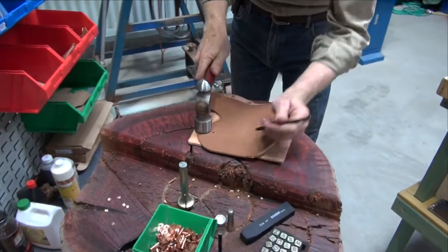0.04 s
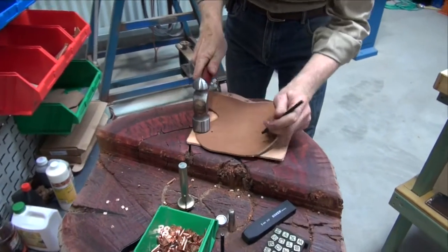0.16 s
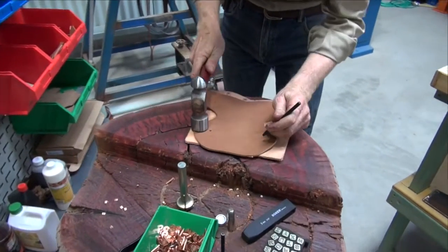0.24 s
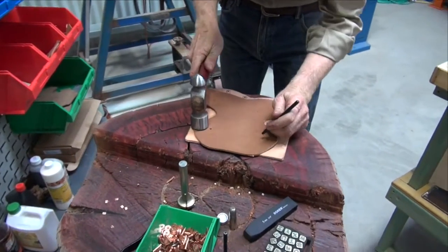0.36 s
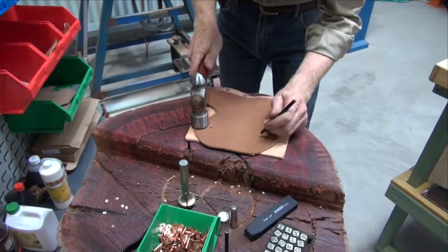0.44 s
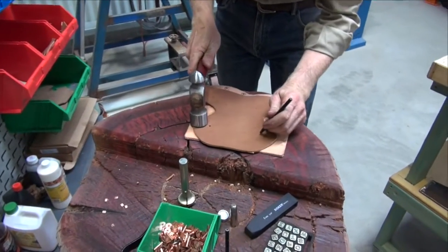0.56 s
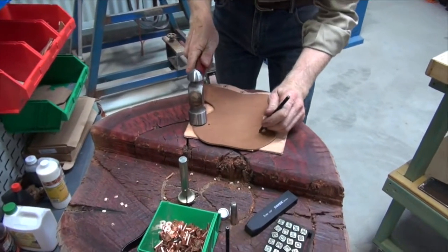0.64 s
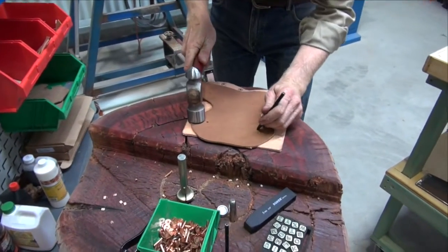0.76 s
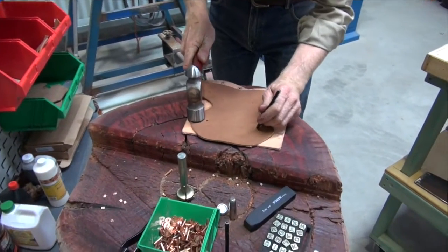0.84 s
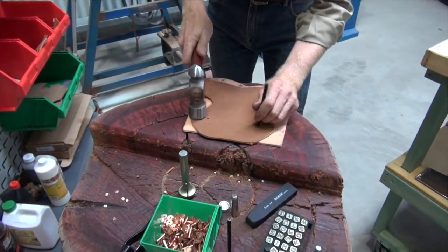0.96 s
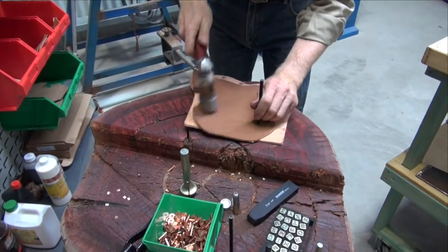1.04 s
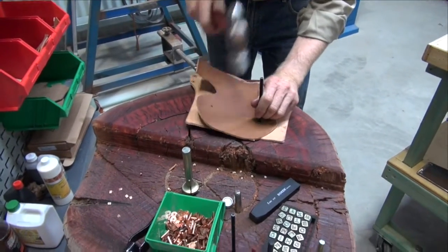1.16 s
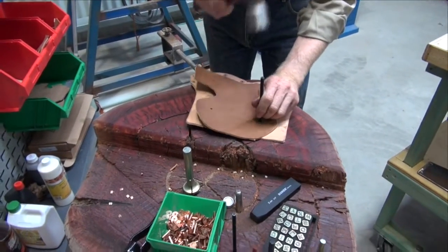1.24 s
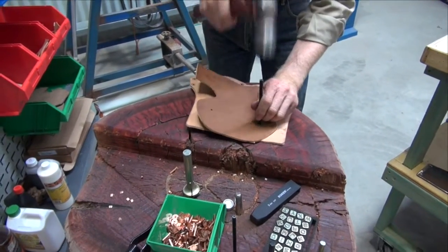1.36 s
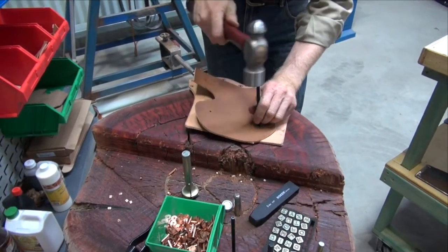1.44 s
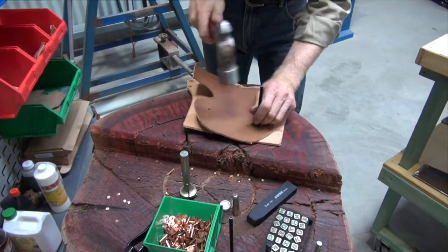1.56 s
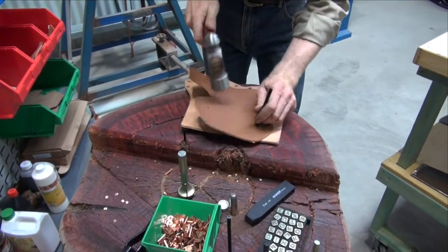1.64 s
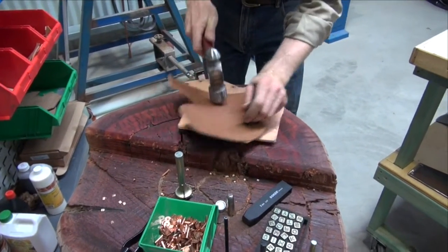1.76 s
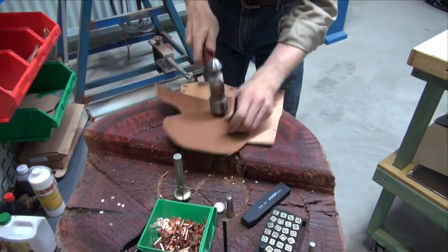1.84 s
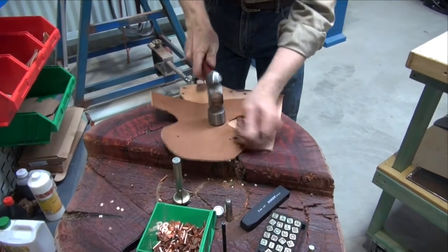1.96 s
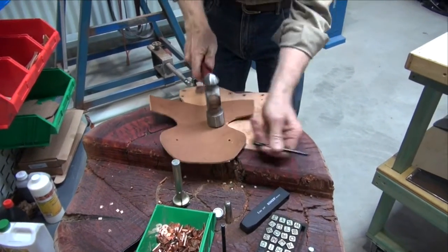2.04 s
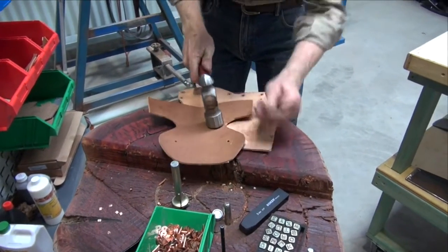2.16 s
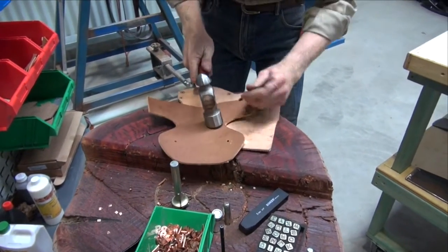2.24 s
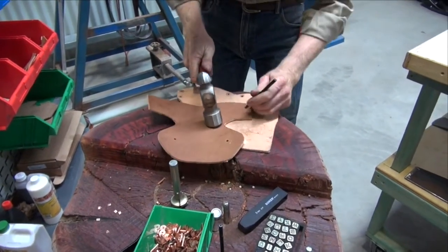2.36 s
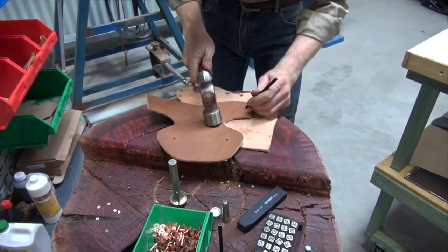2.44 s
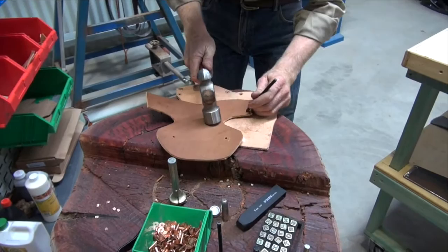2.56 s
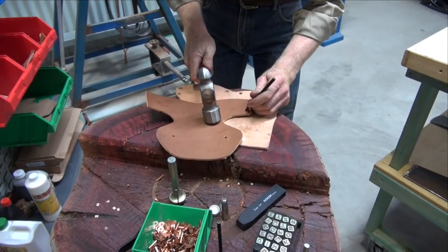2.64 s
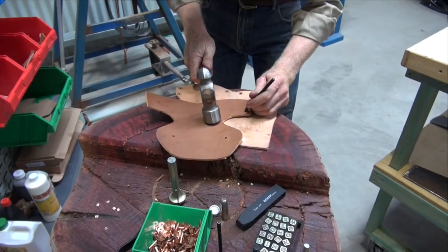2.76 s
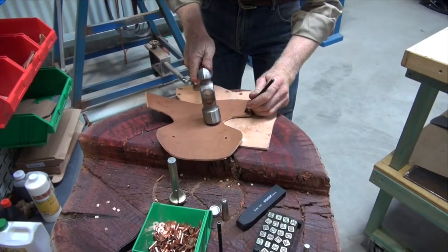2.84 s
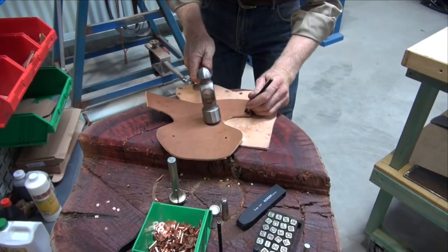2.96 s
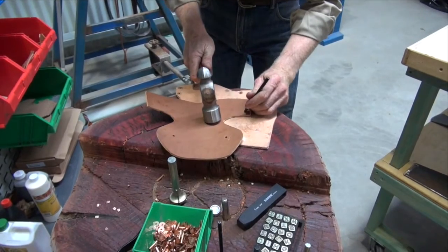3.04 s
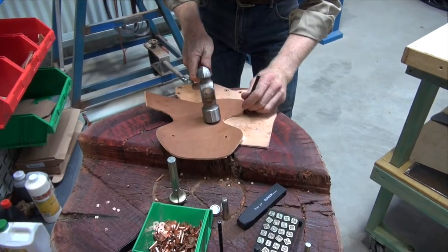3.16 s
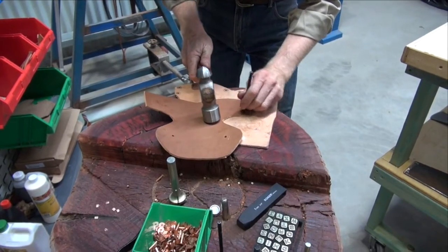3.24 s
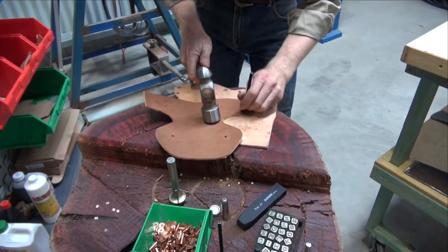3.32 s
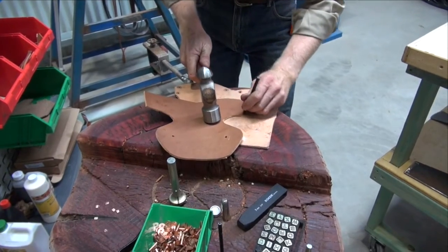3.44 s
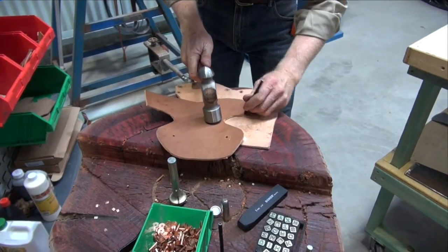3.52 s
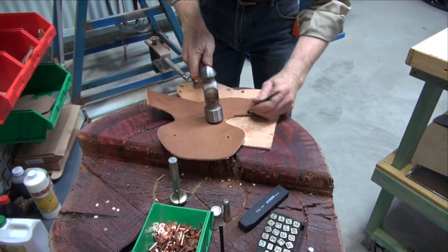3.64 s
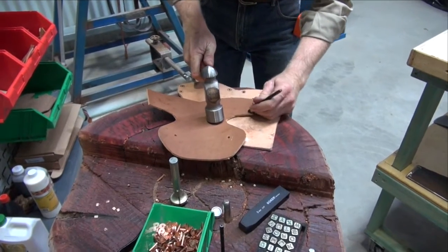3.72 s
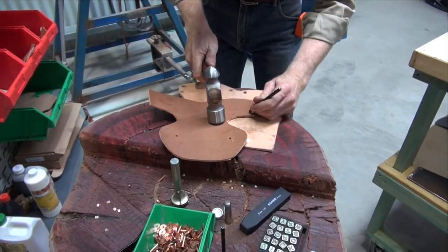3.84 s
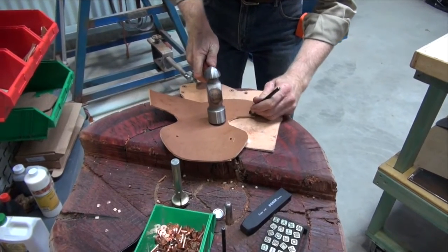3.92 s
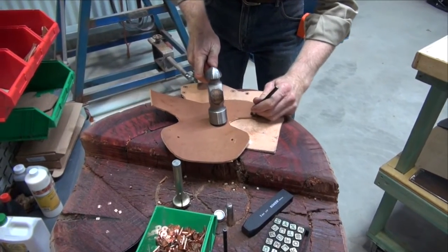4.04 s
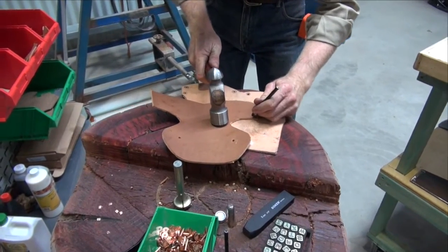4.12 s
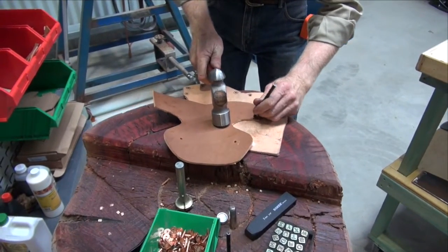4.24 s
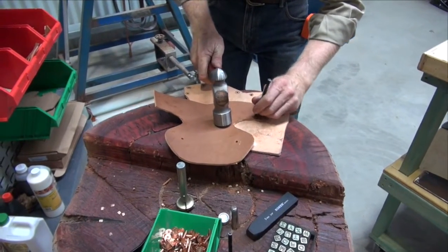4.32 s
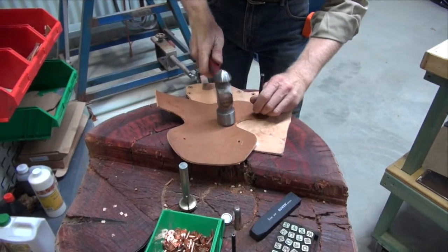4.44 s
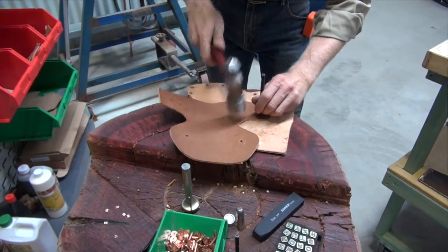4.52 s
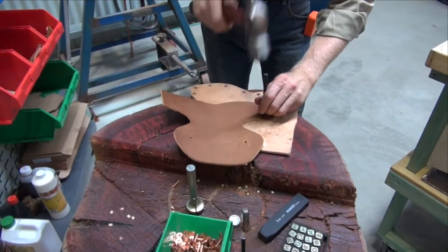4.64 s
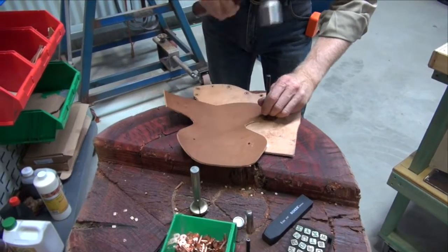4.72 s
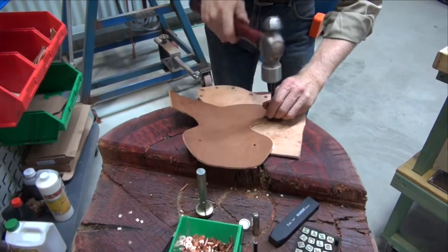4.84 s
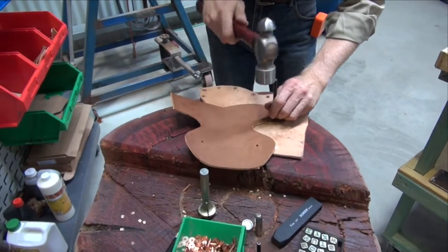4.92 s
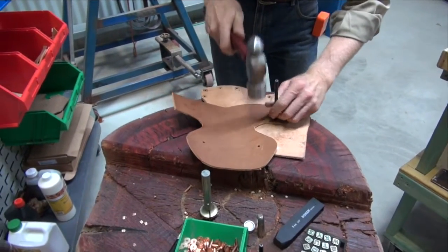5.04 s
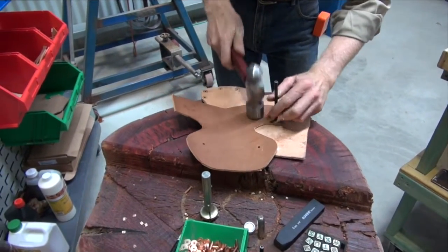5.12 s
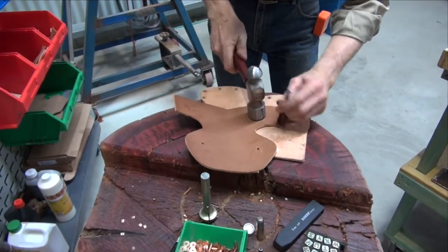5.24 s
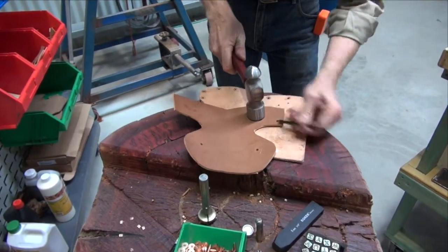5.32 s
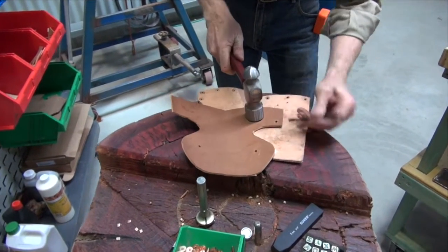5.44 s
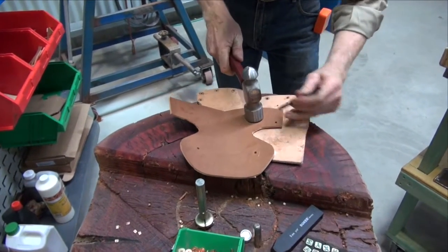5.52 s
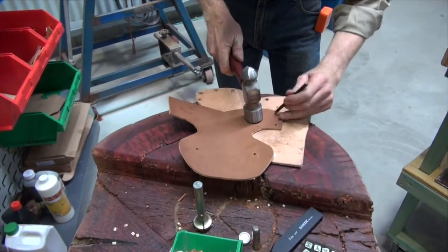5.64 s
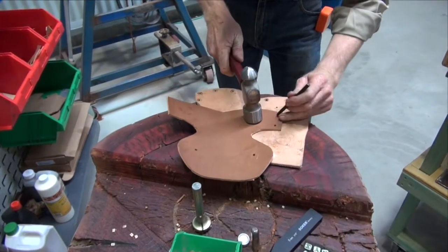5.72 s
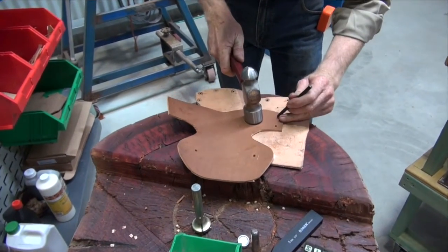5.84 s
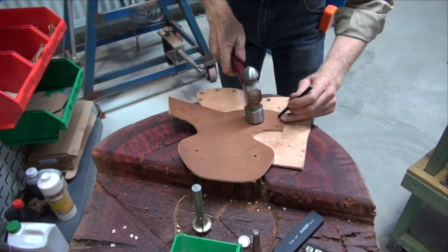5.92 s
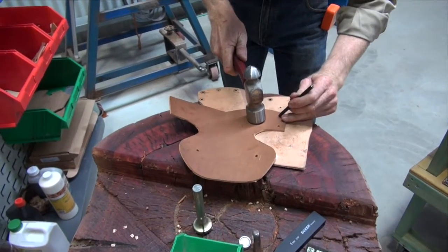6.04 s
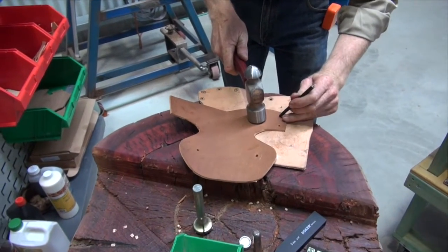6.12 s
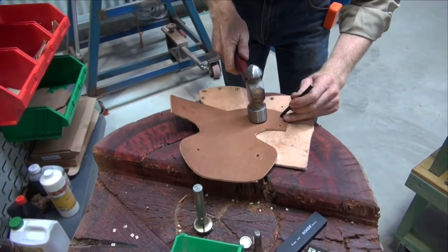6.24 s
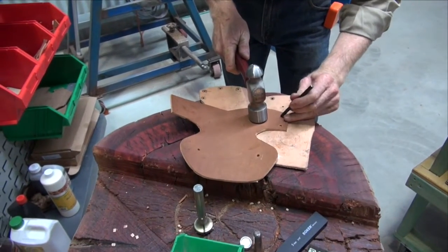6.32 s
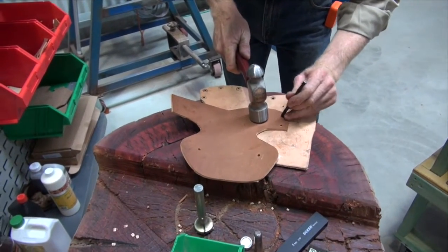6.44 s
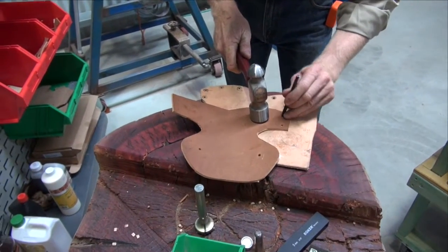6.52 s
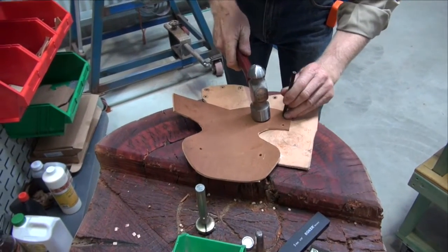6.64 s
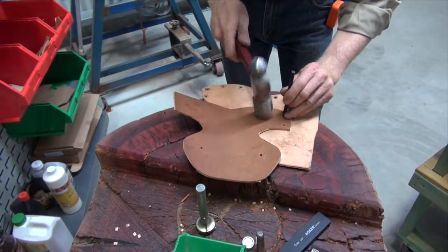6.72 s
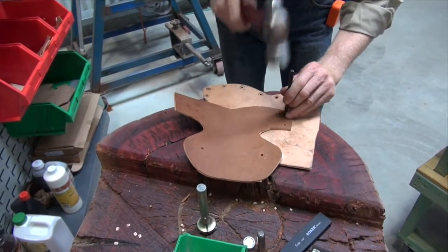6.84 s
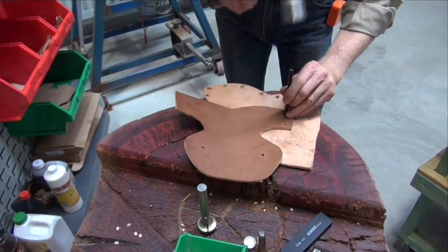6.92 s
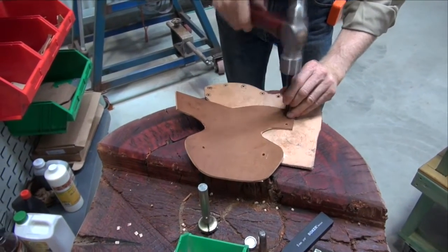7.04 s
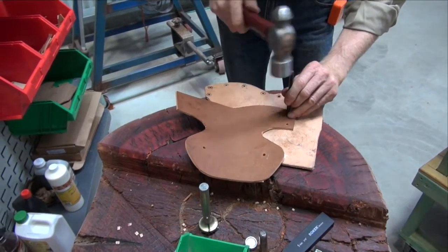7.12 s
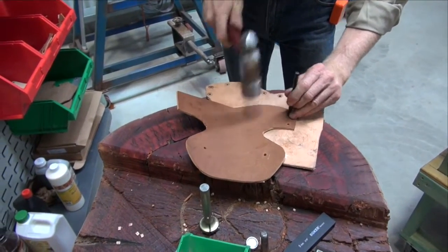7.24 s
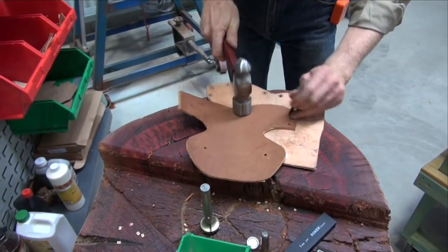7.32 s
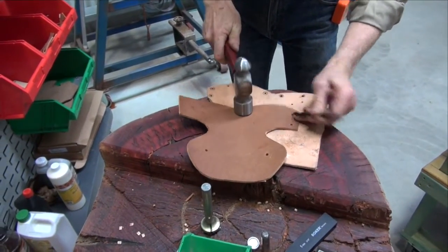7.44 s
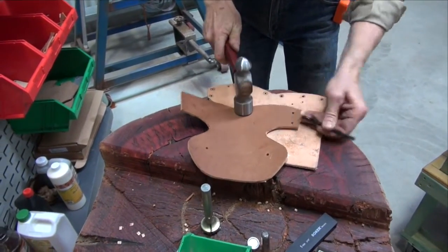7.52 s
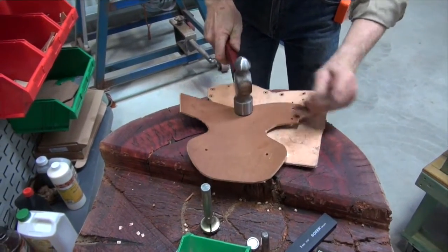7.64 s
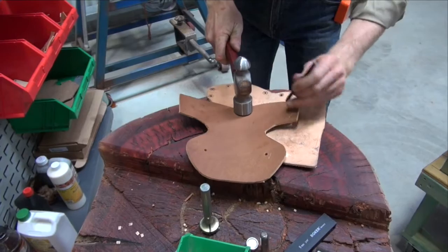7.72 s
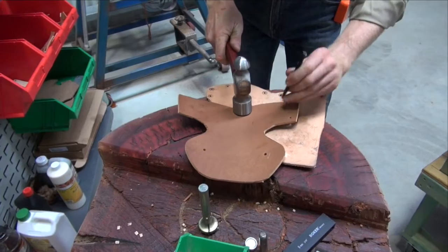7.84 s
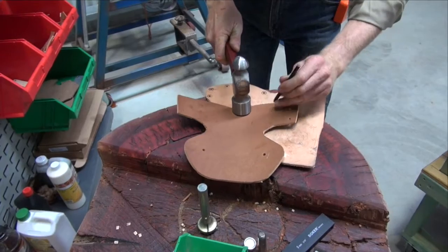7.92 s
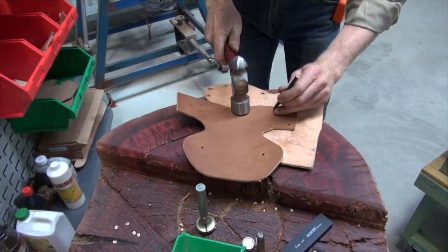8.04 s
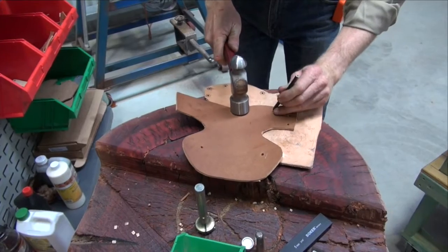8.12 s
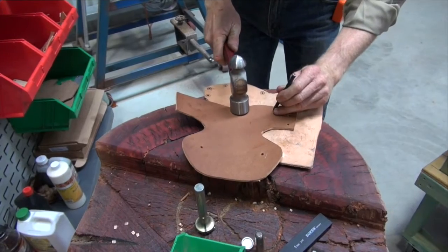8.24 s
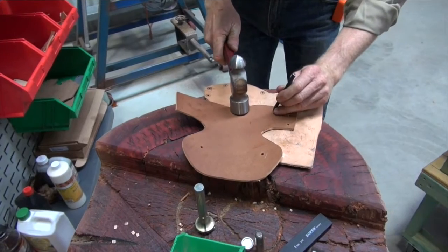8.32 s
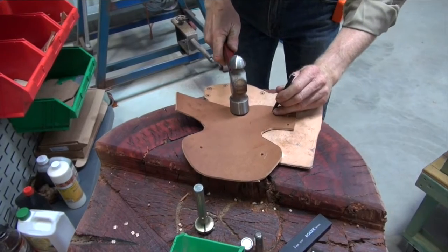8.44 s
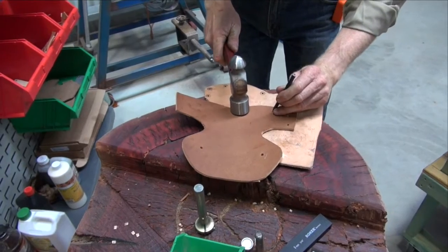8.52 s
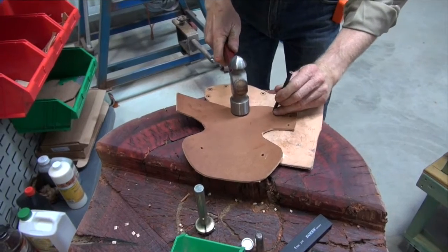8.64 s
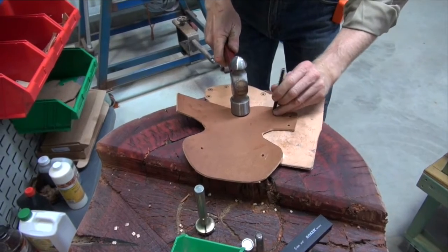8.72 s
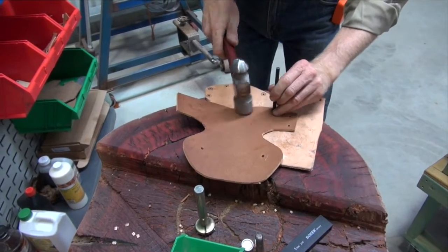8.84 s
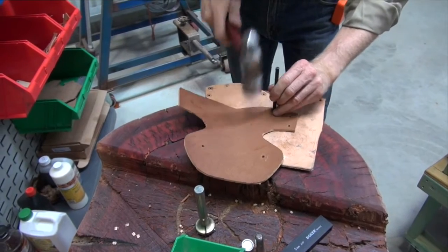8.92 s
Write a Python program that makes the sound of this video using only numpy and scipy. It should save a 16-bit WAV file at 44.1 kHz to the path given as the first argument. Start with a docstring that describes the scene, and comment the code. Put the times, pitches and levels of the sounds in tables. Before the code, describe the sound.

Three widely spaced, explosive metal cracks, each with a quick weaker rebound and a burst of wooden clatter about a third to half a second later. Between them are faint rubbing on leather, soft taps, tiny ticks and barely audible squeaks. The microphone is very close and distorts on the blows, louder on the left, with a long hall ring and low room air behind.

```python
"""A large workshop, two-channel microphone close enough to overload: a hammer drives a steel punch through leather
into a board on a tree stump, three times. Ringing modes make the steel, wood and clinks; shaped noise makes the
crunch, slides, low bump and air; resonators driven by noise make the squeaks. After each blow the hammer is set down
and the board clatters as the punch is pulled free; punch and hand slide over the leather in between.
Each blow ducks the microphone's gain, so the hall's ring swells up afterwards."""
import sys
import numpy as np
from scipy import signal
from scipy.fft import rfft, irfft, next_fast_len
from scipy.io import wavfile

SR = 44100
rng = np.random.default_rng(int(sys.argv[2]) if len(sys.argv) > 2 else 0)


def dump_mix(stems):
    """Bounce the given channels to the path in sys.argv[1] as a 16-bit WAV at rate SR."""
    frames = np.atleast_2d(stems).T  # one column per channel
    limited = np.clip(frames, -1, 1)  # hard clip at full scale
    pcm = np.round(limited * 32767).astype(np.int16)
    wavfile.write(sys.argv[1], SR, pcm)


N = 395577
TIME = np.arange(N) / SR  # s

# Hammer blows on the punch: start_s, level_db, off_centre (0-1), crunch_t60_s
BLOWS = [(1.4578, 14.5, 0, 0.0031), (4.8952, 13.5, .03, 0.0038), (7.1029, 11, 0.78, 0.009)]
# The hammer bounces once on the punch after each blow: start_s, level_db
REBOUNDS = [(1.49, -2), (4.926, -13.5), (7.14, -7.5)]
# Modes of hammer and hand-held punch: pitch_hz, t60_s, square_hit_db, off_centre_hit_db
STEEL_MODES = [(2060, 0.0086, -5, -13), (3975, 0.0065, -5.5, -9), (4840, 0.012, -17.5, -14.5),
               (5360, 0.0096, -7.5, -7), (5694, 0.009, -2, -8.5), (6340, 0.0087, -6.5, 0.5),
               (7304, 0.0075, -0.5, -8), (7640, 0.016, -5.5, -10.5), (8294, 0.0095, -21, -0.5),
               (9260, 0.0052, -3.5, -29), (11950, 0.007, -16.5, -0.5), (13240, .007, 0.5, -6.5),
               (13900, 0.008, -2.5, -9), (15320, .006, -16.5, 1.5)]
# Spectrum of the edge crunching through leather into wood: freq_hz, relative level_db (per Hz)
CRUNCH_SPECTRUM = [(100, -5.5), (400, -8.5), (900, -13), (2000, 4.5), (4500, -4.5), (8000, -1), (11000, 3),
                   (16000, -2.5)]
# Hammer set down, board clattering: start_s, clack_db, thud_db, contact_brightness_hz,
# second_contact_delay_s, second_clack_db, rocking_s, clink_pitch_hz, clink_db
LANDINGS = [(1.9444, 11.5, -9.5, 1750, .0091, 6.5, .02, 1754, -36),
            (5.1933, 13.5, -4.5, 4250, 0.00135, 2.5, .085, 2970, -28),
            (7.3788, 9.5, -5.5, 3970, .0042, 4.5, .06, 2280, -25)]
# Hard knocks of punch and board: start_s, clack_db, thud_db
KNOCKS = [(1.0937, -27, -48), (1.979, 2.5, -30), (1.9896, 4, -13.5), (2.0078, 1, -32), (2.0124, 4.5, -14),
          (5.2375, -6, -18), (5.2505, -4.5, -14.5), (5.2581, -5.5, -13.5), (5.326, -9.5, -24),
          (5.338, -2.5, -39), (5.345, -1, -27), (5.357, -12, -30), (7.4042, 5.5, -19), (7.438, -10, -11),
          (7.4552, 6, -14), (7.4653, 2.5, -18.5), (7.4805, -0.5, -17), (7.4911, 2.5, -17.5)]
# Dull taps cushioned by the leather: start_s, clack_db
TAPS = [(1.669, -9.5), (1.7639, 2), (1.9, -9), (1.925, -4.5), (2.407, -11.5), (2.61, -22), (3.149, -14.5),
        (5.386, -6), (5.692, -11), (7.783, -17.5), (8.078, -24), (8.112, -17.5)]
# Modes of the board's clack: pitch_hz, level_db, t60_s
BOARD_MODES = [(688, -14, .012), (922, -6, 0.0053), (1130, -9.5, 0.0086), (1462, -10.5, 0.0076),
               (1724, -5, 0.0039), (2100, -8.5, .006), (2450, -10.5, 0.0045), (2905, -9, 0.0049),
               (4000, -9.5, 0.0017), (6530, -11, 0.0016), (11500, -12, 0.00099)]
# Modes of the stump's thud: pitch_hz, level_db, t60_s
STUMP_MODES = [(129, -18.5, 0.027), (205, -13, 0.034), (262, -5.5, 0.027), (294, -9, 0.024),
               (353.7, -11, 0.05), (403.5, -7, 0.033), (493, -10, .085), (511, -10, 0.04),
               (610, -11.5, 0.049), (715, -14.5, 0.068), (804, -18.5, .04)]
# Strokes over the leather: start_s, length_s, low_rasp_db, high_hiss_db
SLIDES = [(1.009, 0.099, -56, -45.5), (1.896, 0.037, -50, -43.5), (2.377, 0.088, -50, -56.5),
          (2.508, 0.13, -57.5, -54), (3.138, 0.047, -42, -48), (3.654, 0.13, -51, -53.5),
          (4.105, 0.44, -61.5, -75.5), (4.459, 0.087, -55.5, -45.5), (5.2544, 0.0082, -45, -23),
          (5.37, 0.073, -62, -54), (6.472, 0.13, -55.5, -64), (6.688, 0.033, -55, -57.5),
          (6.789, 0.1, -55.5, -69.5), (7.56, 0.076, -62, -50), (7.929, 0.075, -53, -52.5),
          (8.443, 0.08, -57, -52.5), (8.838, 0.063, -57.5, -45.5)]
# The punch's edge ticking as it is placed: start_s, level_db
TICKS = [(2.358, -40.5), (4.475, -40), (7.784, -32), (8.8277, -26), (8.890, -33)]
# Spectrum of the low rasp of a slide: freq_hz, relative level_db (per Hz)
RASP_SPECTRUM = [(100, -37.5), (380, 5.5), (1200, 7), (2500, -0.5), (6000, -6.5), (16000, -36)]
# Spectrum of the high hiss of slides and ticks: freq_hz, relative level_db (per Hz)
HISS_SPECTRUM = [(200, -18.5), (1500, 2.5), (4000, 9), (8000, 5), (13000, 6.5), (16000, 6)]
# The punch twisting in the leather: start_s, length_s, level_db
TWISTS = [(5.5, 0.21, -48.5), (7.84, 0.11, -49), (7.935, 0.3, -55)]
# Modes of its squeak: pitch_hz, relative level_db, t60_s
SQUEAK_MODES = [(1023, 5.5, 0.015), (1580, -8, .016)]
# Something soft bumping the floor: start_s, level_db
BUMPS = [(7.741, -45)]
# Spectrum of that bump: freq_hz, relative level_db (per Hz)
BUMP_SPECTRUM = [(50, -15.0), (105, 9), (250, -23), (800, -61)]
# Decay of the hall's ring: freq_hz, t60_s
HALL_T60 = [(100, 2), (500, 1.54), (2000, 1.29), (4000, 1.41), (7000, 1.0), (10000, 0.68), (13000, 0.8),
            (16000, 0.3)]
# Colour of the hall's ring: freq_hz, relative level_db
HALL_COLOUR = [(60, -5), (250, 2), (600, 1.5), (1500, -4.5), (3000, 1), (4500, 4.5), (7000, 5), (11000, 5),
               (13500, 3.5), (16000, -3)]
# Spectrum of the ring already in the hall at the start: freq_hz, relative level_db (per Hz)
OPENING_RING = [(60, -25), (250, 3), (550, 7), (1500, -4.5), (2800, -4), (4600, -0.5), (8000, -9),
                (16000, -6.5)]
# Spectrum of the workshop's air: freq_hz, relative level_db (per Hz)
AIR_SPECTRUM = [(20, -22.5), (40, -8), (56, 8), (85, -6.5), (140, -4), (220, -1.5), (330, -13.5),
                (700, -13.5), (2000, -22), (6000, -29), (16000, -50.5)]
# How much of the airborne sound the right side hears: freq_hz, level_db
RIGHT_SIDE = [(50, -16), (130, -13.5), (260, -8), (500, -10.5), (1000, -12), (4000, -14.5), (12000, -11)]
# Spectrum of the microphone's hiss: freq_hz, relative level_db (per Hz)
MIC_NOISE = [(20, -18), (120, -7), (230, -4), (350, 7), (1000, 3.5), (3000, 0.5), (8000, -4), (16000, -4)]


def steel_ring():
    """Steel on steel, damped by hand and leather in milliseconds; the point of impact decides which modes speak."""
    blows = [blow[:3] for blow in BLOWS]
    # each rebound lands where its blow did
    rebounds = [(s, db, off) for (_, _, off, _), (s, db) in zip(BLOWS, REBOUNDS)]
    start_s, level_db, off_centre = np.transpose(blows + rebounds)
    off = np.clip(off_centre, 0, 1)
    out = np.zeros(N)
    for k, (hz, t60, square_db, off_db) in enumerate(STEEL_MODES):
        share = (1 - off) * from_db(square_db) + off * from_db(off_db)
        hits = clicks(start_s, from_db(level_db) * share)
        out += ring(hits, hz, t60) * (-1) ** k
    return out


def cutting(crunch_db=2, crack_db=18):
    """The edge crunches through leather, differently toward each side; one even crack is made for the hall."""
    start_s, level_db, _, crunch_t60 = np.transpose(BLOWS)
    bite = sum(from_db(db) * dying(s, t60) for s, db, t60 in zip(start_s, level_db, crunch_t60))
    crunch = from_db(crunch_db) * bite * noise(CRUNCH_SPECTRUM, channels=2)
    # a longer crunch carries more energy into the hall
    energy = np.sqrt(crunch_t60 / crunch_t60.mean())
    crack = high_pass(clicks(start_s, from_db(level_db + crack_db) * energy), hz=300)
    # fullest in the upper middle
    crack = smooth(crack - 0.47 * smooth(crack, seconds=.0001), seconds=.00002)
    return crunch, crack


def landing_contacts(touch_thud_db=-11.5, second_thud_db=-1.5, settle_s=.004, settle_loss_db=2, rock_every_s=.013):
    """The hammer's head touches, tips over and settles with full weight; the board rocks on in weak, uneven touches."""
    rows = []
    for start_s, clack_db, thud_db, hz, delay_s, second_db, rocking_s, _, _ in LANDINGS:
        second_s = start_s + delay_s
        settled_s = second_s + settle_s
        rows.append((start_s, clack_db, thud_db + touch_thud_db, hz))
        rows.append((second_s, second_db, thud_db + second_thud_db, 3500))
        rows.append((settled_s, second_db - settle_loss_db, thud_db, 2400))
        ages = np.cumsum(rock_every_s * rng.uniform(.6, 1.4, size=12))
        rows += [(settled_s + age, 1, -19.5, 750) for age in ages if age < rocking_s]
    return rows


def wood_contacts(tap_thud_db=-30.5, tap_thud_follows=0.22):
    """Hard and cushioned contacts with the wood: start_s, clack_db, thud_db, contact_brightness_hz."""
    # the board's share of a rebound is half a decibel down
    rebounds = [(s, db - 0.5, -42, 18000) for s, db in REBOUNDS]
    knocks = [(s, db, thud_db, 4630) for s, db, thud_db in KNOCKS]
    # a tap's thud grows more slowly than its clack
    taps = [(s, db, tap_thud_db + tap_thud_follows * db, 940) for s, db in TAPS]
    return rebounds + knocks + landing_contacts(), taps


def board_clacks(contacts, scatter_db=2.0, stiffness=1.39):
    """Each contact is a short rounded push, longer and duller when soft, shared unevenly among the board's modes."""
    start_s, clack_db, _, contact_hz = np.transpose(contacts)
    age = np.arange(128) / SR
    push = age * np.exp(-2 * np.pi * stiffness * contact_hz[:, None] * age)
    push /= push.sum(axis=1, keepdims=True)
    scatter = scatter_db * rng.standard_normal((len(start_s), len(BOARD_MODES)))
    shares = from_db(clack_db[:, None] + scatter)
    out = np.zeros(N)
    for k, (hz, db, t60) in enumerate(BOARD_MODES):
        force = clicks(start_s[:, None] + age, push * shares[:, [k]] * from_db(db))
        out += ring(force, hz, t60) * (-1) ** k
    return high_pass(out, hz=350)


def board(hard, cushioned, cushion_hz=2090):
    """The board answers hard contacts in full; leather low-passes the taps."""
    leather = signal.butter(2, cushion_hz, fs=SR, output="sos")
    return board_clacks(hard) + signal.sosfilt(leather, board_clacks(cushioned))


def stump_thuds(contacts, scatter_db=6.0):
    """The weight behind each knock rings the stump's low modes, each mode unevenly."""
    start_s, _, thud_db, _ = np.transpose(contacts)
    scatter = scatter_db * rng.uniform(-1, 1, (len(start_s), len(STUMP_MODES)))
    shares = from_db(thud_db[:, None] + scatter)
    out = np.zeros(N)
    for k, (hz, db, t60) in enumerate(STUMP_MODES):
        out += ring(clicks(start_s, shares[:, k] * from_db(db)), hz, t60) * (-1) ** k
    return high_pass(smooth(out, seconds=0.00024), hz=110)


def clinks(t60=0.019, touch_thud_db=-11.5, follows=.55, damping=0.42, free_db=-32):
    """Hard, light contacts also sound a brief note, pitched per clatter; weight on the tool stops its ring."""
    touches = [(s, db, thud_db + touch_thud_db) for s, db, thud_db, *_ in LANDINGS]
    start_s, clack_db, thud_db = np.transpose(touches + list(KNOCKS))
    # dB of clink per dB of clack, less dB lost per dB of thud; below free_db the tool rings freely
    strength_db = follows * clack_db - damping * np.maximum(thud_db, free_db)
    nearest = np.abs(start_s[:, None] - np.array(LANDINGS)[:, 0]).argmin(axis=1)
    out = np.zeros(N)
    for k, (*_, hz, clink_db) in enumerate(LANDINGS):
        out += ring(clicks(start_s, (nearest == k) * from_db(clink_db + strength_db)), hz, t60)
    return out


def leather_slides(grain_db=2.5, grain_s=.002):
    """Friction swells and fades with each stroke, catching on the leather's grain; the edge ticks where it lands."""
    rasp, hiss = np.zeros(N), np.zeros(N)
    for start_s, length_s, rasp_db, hiss_db in SLIDES:
        stroke = half_sine(start_s, length_s)
        rasp += from_db(rasp_db) * stroke
        hiss += from_db(hiss_db) * stroke
    grain = smooth(rng.standard_normal(N), grain_s)
    catching = from_db(grain_db * grain / grain.std() + 0.5)
    ticks = sum(from_db(db) * dying(s, t60=0.011) for s, db in TICKS)
    low = (rasp * catching + from_db(-7.0) * ticks) * noise(RASP_SPECTRUM)[0]
    high = (hiss * catching + ticks) * noise(HISS_SPECTRUM)[0]
    return low + high


def squeaks():
    """The twisting punch rubs up a faint, hoarse note: noise-like friction drives two damped modes."""
    friction = rng.standard_normal(N)
    note = sum(from_db(db) * ring(friction, hz, t60) for hz, db, t60 in SQUEAK_MODES)
    twisting = sum(from_db(db) * half_sine(s, length) for s, length, db in TWISTS)
    return note / note.std() * twisting


def floor_bump(t60=0.39):
    """A soft, low bump of dying noise."""
    return sum(from_db(db) * dying(s, t60) for s, db in BUMPS) * noise(BUMP_SPECTRUM)[0]


def hall(x, ring_db=-16, near_db=-14, near_t60=.066, build_s=.005):
    """Quick scatter from the benches, and a long diffuse ring whose decay time depends on frequency."""
    size = 65536  # samples of response
    age, hz = TIME[:size], np.fft.rfftfreq(size, 1 / SR)
    white = rfft(rng.standard_normal((2, size))) * from_db(at_hz(HALL_COLOUR, hz))
    edges = np.geomspace(40, SR / 2, 22)
    tail = np.zeros((2, size))
    for low, high in zip(edges, edges[1:]):
        band = irfft(white * (hz >= low) * (hz < high))
        tail += band * np.exp(-np.log(1000) * age / at_hz(HALL_T60, np.sqrt(low * high)))
    tail = tail * (1 - np.exp(-age / build_s))
    near = rng.standard_normal((2, size)) * dying(0, near_t60)[:size] * (age > .0015)
    response = np.zeros((2, size))
    for db, part in [(ring_db, tail), (near_db, near)]:
        response += from_db(db) * part / np.linalg.norm(part, axis=1, keepdims=True)
    return signal.fftconvolve(x[None], response, axes=1)[:, :N]


def opening_ring():
    """The hall still rings from earlier work: dying noise on both sides."""
    return from_db(-38.0) * dying(0, t60=1.15) * noise(OPENING_RING, channels=2)


def workshop_air():
    """The steady, low-toned air of the workshop: noise unrelated between sides."""
    return from_db(-55.5) * noise(AIR_SPECTRUM, channels=2)


def from_db(db):
    """Decibels to gain."""
    return 10 ** (np.asarray(db) / 20)


def at_hz(points, hz):
    """Read a table on a log-frequency axis."""
    f, value = np.transpose(points)
    return np.interp(np.log(np.maximum(hz, 1)), np.log(f), value)


def coloured(x, spectrum):
    """Weight a sound by a smooth spectrum."""
    size = next_fast_len(N + 4096, True)
    gain = from_db(at_hz(spectrum, np.fft.rfftfreq(size, 1 / SR)))
    return irfft(rfft(x, size) * gain, size)[..., :N]


def noise(spectrum, channels=1):
    """Noise of rms 1 with the given spectrum, unrelated between channels."""
    x = coloured(rng.standard_normal((channels, N)), spectrum)
    return x / x.std()


def dying(start_s, t60):
    """An envelope that jumps to 1 and dies away by 60 dB in t60 seconds."""
    age = TIME - start_s
    return (age >= 0) * from_db(-60 * np.clip(age / t60, 0, 5))


def half_sine(start_s, length_s):
    """An envelope that swells to 1 and fades over one stroke."""
    return np.sin(np.pi * np.clip((TIME - start_s) / length_s, 0, 1))


def clicks(times, heights):
    """Single-sample pushes."""
    out = np.zeros(N)
    np.add.at(out, np.round(np.asarray(times) * SR).astype(int), heights)
    return out


def ring(force, hz, t60):
    """A damped mode: a unit push sets it ringing with height 1."""
    r, w = from_db(-60 / (t60 * SR)), 2 * np.pi * hz / SR
    return signal.lfilter([1, -r * np.cos(w)], [1, -2 * r * np.cos(w), r * r], force + 1e-18)


def smooth(x, seconds):
    """One-pole low-pass."""
    r = np.exp(-1 / (seconds * SR))
    return signal.lfilter([1 - r], [1, -r], x + 1e-18)


def high_pass(x, hz):
    """Second-order low cut."""
    return signal.sosfilt(signal.butter(2, hz, "high", fs=SR, output="sos"), x)


def scene(right_blow_db=-13, right_clack_db=-2, right_thud_db=5, right_lead_s=.00062,
          steel_ring_db=-5, wood_ring_db=-2.0, clink_ring_db=-7):
    """The right side hears blows, clacks and slides earlier, all more weakly, with its own mix of the wood's modes."""
    steel = steel_ring()
    crunch, crack = cutting()
    slides = leather_slides() + squeaks()
    hard, cushioned = wood_contacts()
    notes = clinks()
    wood = board(hard, cushioned) + stump_thuds(cushioned + hard)
    left = steel + crunch[0] + wood + notes + slides

    right_blows = from_db(right_blow_db) * (steel + crunch[1])
    right_work = from_db(right_clack_db) * (board(hard, cushioned) + slides)
    right = np.roll(right_blows + right_work, -round(right_lead_s * SR))
    right = right + from_db(right_thud_db) * stump_thuds(cushioned + hard)

    to_hall = from_db(steel_ring_db) * steel + from_db(wood_ring_db) * wood + from_db(clink_ring_db) * notes + slides
    room = hall(to_hall) + hall(crack)
    sides = np.array([left, right]) + room + opening_ring() + workshop_air() + floor_bump()
    return np.array([sides[0], coloured(sides[1], RIGHT_SIDE)])


def gain_control(x, threshold_db=-6.5, release_db_per_s=175, attack_s=0.0038, sense_s=0.00055):
    """Loud peaks pull each side's gain down within milliseconds; it climbs back at a steady rate."""
    level_db = 10 * np.log10(smooth(x ** 2, sense_s) + 1e-12)
    climb = release_db_per_s * TIME
    excess_db = np.maximum(level_db - threshold_db, 0)
    # a running maximum on a rising ramp gives the steady release
    duck_db = np.maximum.accumulate(excess_db + climb, axis=1) - climb
    return x * from_db(-smooth(duck_db, attack_s))


def record(dry, bias_db=2.5, bias_leak_db=-18, bias_s=.035, cutoff_hz=16000):
    """Microphone hiss, gain control and hard overload, which shifts the bias and leaves a low thump; the top is cut."""
    hiss = from_db([[-61], [-57.5]]) * noise(MIC_NOISE, channels=2)
    x = gain_control(dry + hiss)
    overload = np.tanh(np.maximum(np.abs(x) - .5, 0) * 3)
    thump = smooth(smooth(overload, bias_s), seconds=0.0011)
    # a little of each side's thump leaks into the other
    bias = thump + from_db(bias_leak_db) * thump[::-1]
    x = np.clip(x, -1, 1) - from_db(bias_db) * bias
    top_cut = signal.ellip(10, .2, 70, cutoff_hz, fs=SR, output="sos")
    return np.clip(signal.sosfilt(top_cut, x), -1, 1)


dry = scene()
out = record(dry)
dump_mix(out)
```